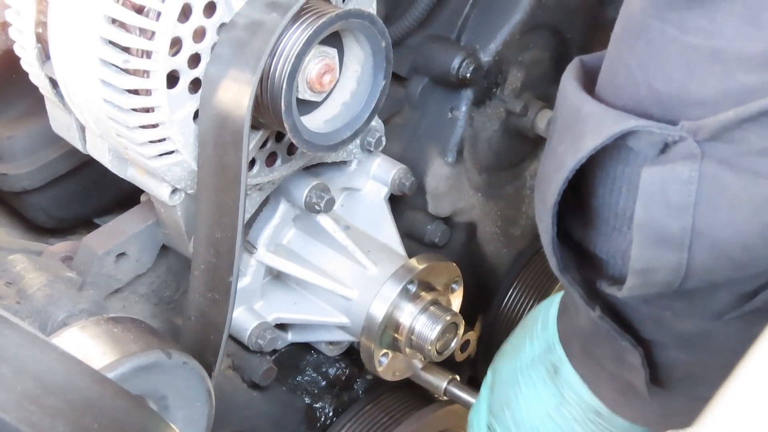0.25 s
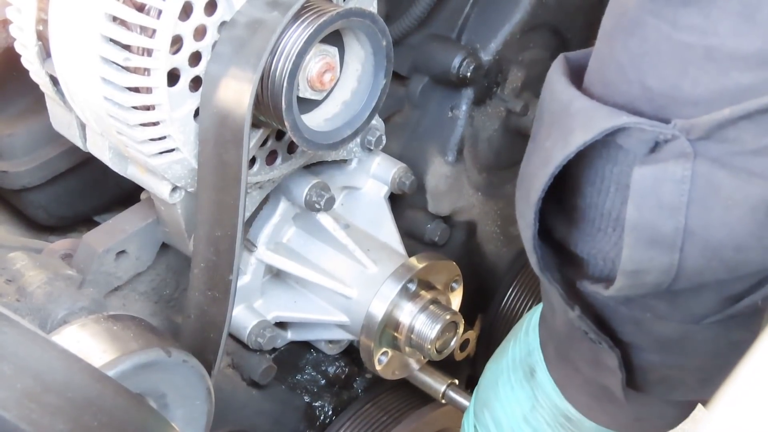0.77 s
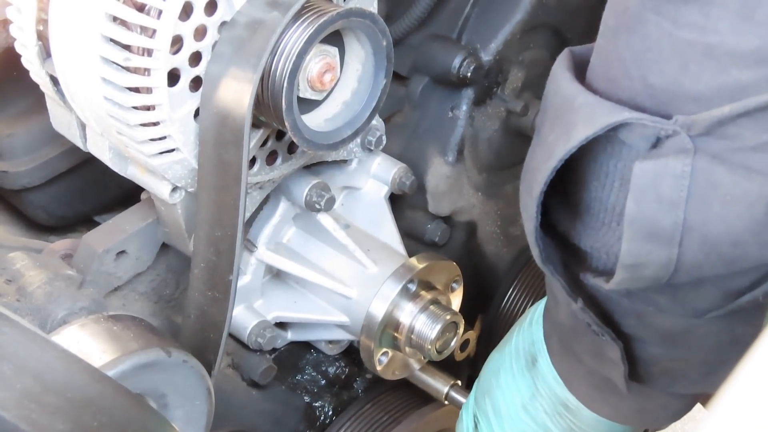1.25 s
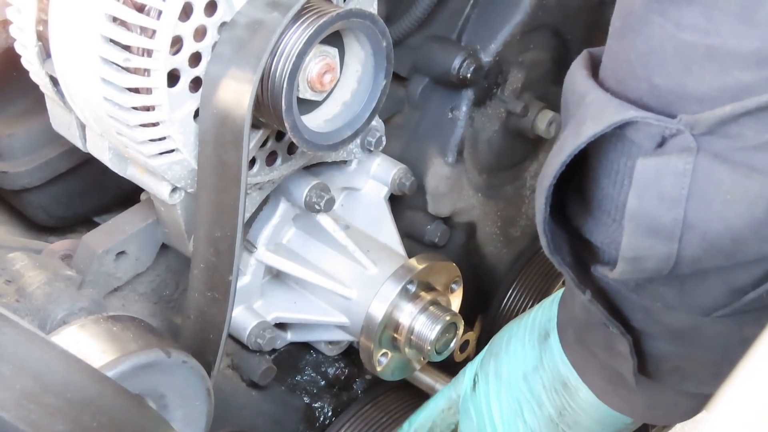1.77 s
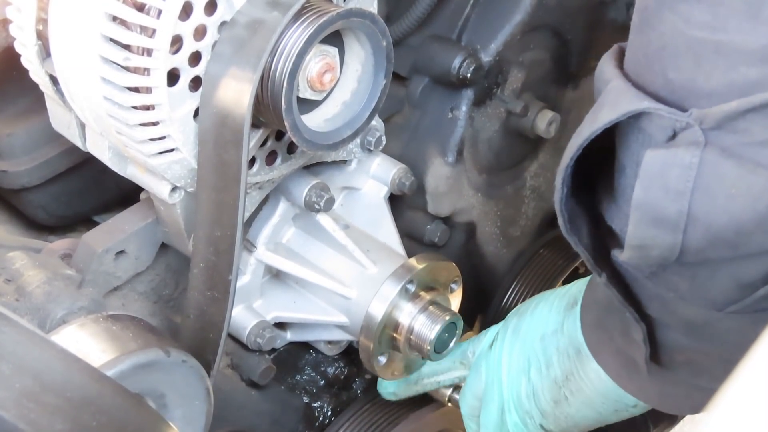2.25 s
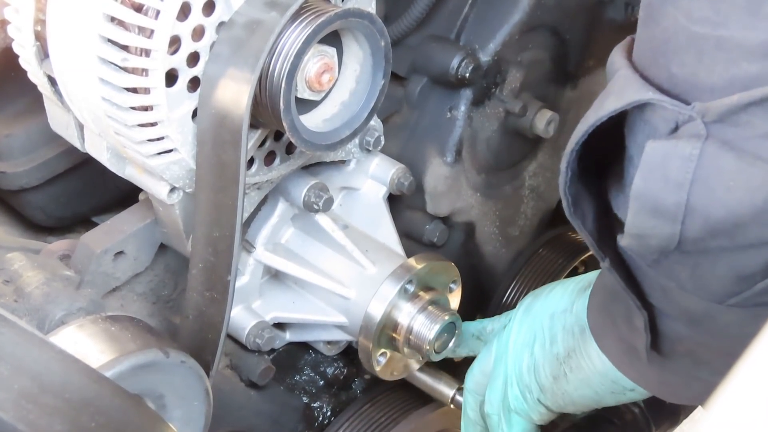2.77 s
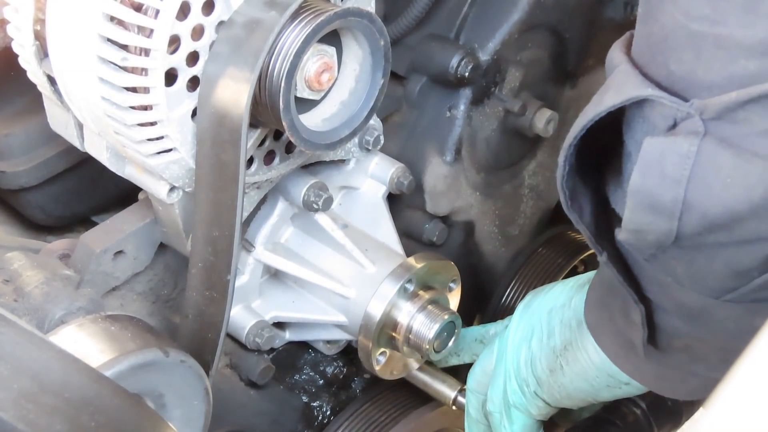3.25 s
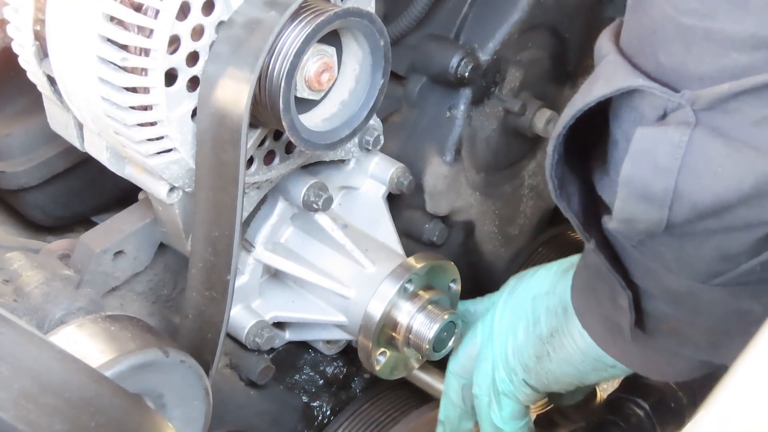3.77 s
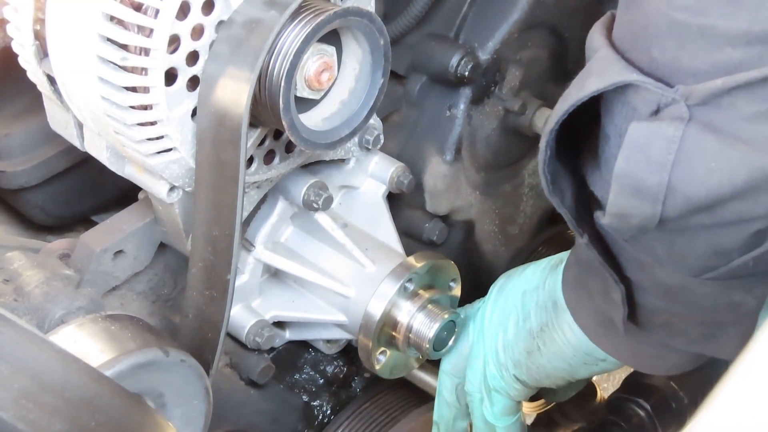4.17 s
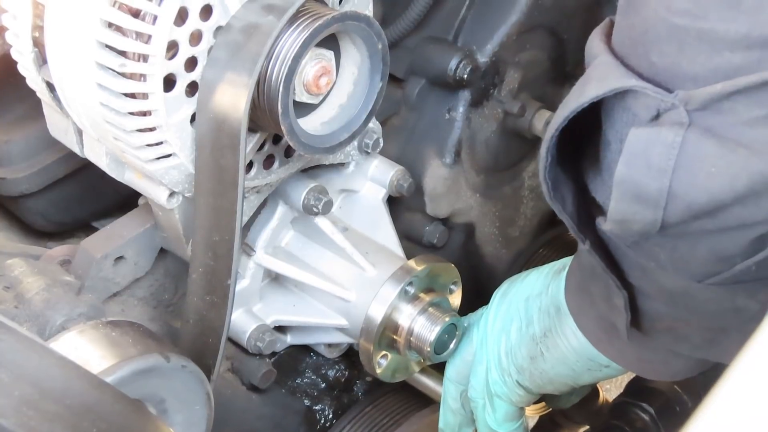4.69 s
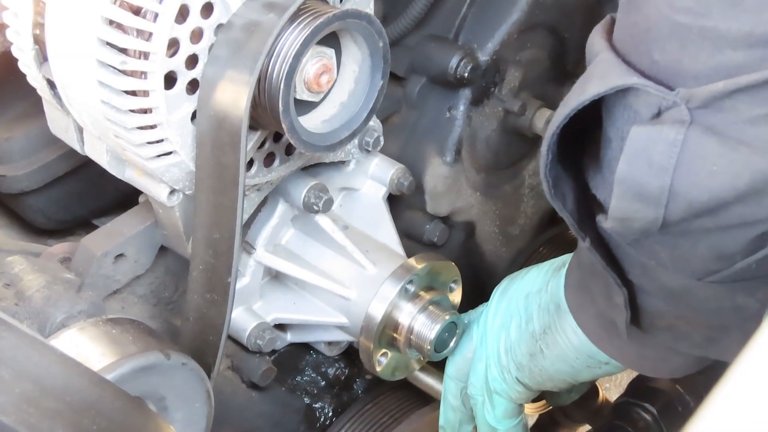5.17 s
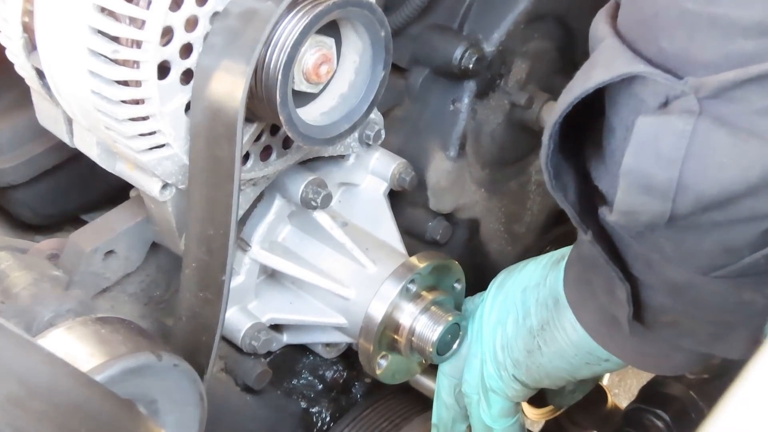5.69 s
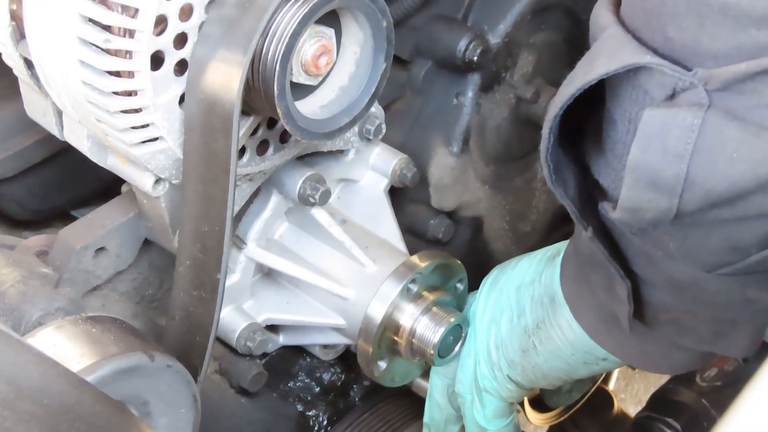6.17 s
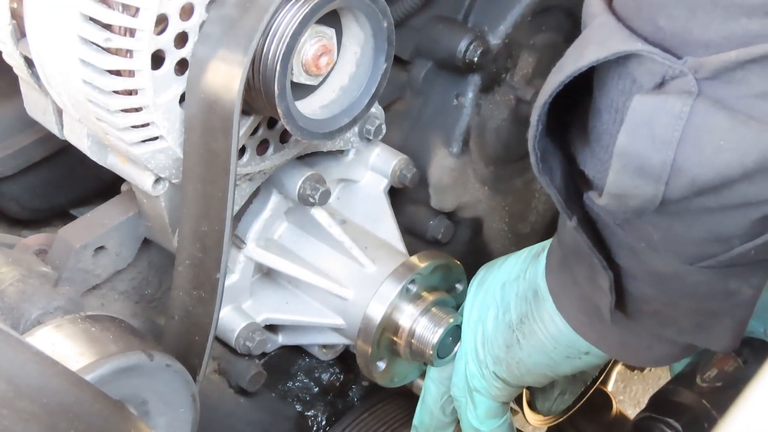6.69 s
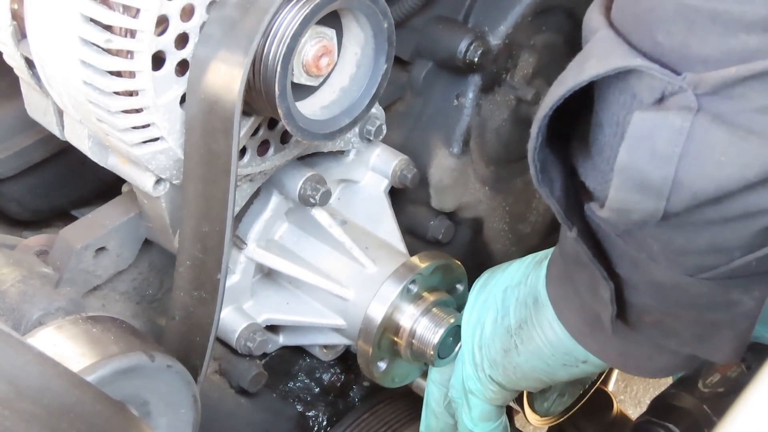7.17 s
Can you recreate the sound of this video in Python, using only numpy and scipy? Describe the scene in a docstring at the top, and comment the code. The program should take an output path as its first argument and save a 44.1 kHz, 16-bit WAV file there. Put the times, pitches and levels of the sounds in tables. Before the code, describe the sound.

A power ratchet clicks onto an engine bolt, knocks as it starts, then runs with a fast metallic rattle, pausing once near the end.

```python
"""In a workshop, a power ratchet runs a bolt out of an engine block, heard from close by.
The socket clicks onto the bolt, the tool knocks slowly as it starts, then runs at full speed.
A crank rocks the pawl (the catch that drives the teeth) about 55 times a second; gears and socket
rattle and make the steel head ring, while the air in the case hums. Near the end the trigger is
let go once and pulled again. Faint room hiss and a low rumble lie underneath."""
import sys
import numpy as np
from scipy import signal
from scipy.io import wavfile

SR = 44100
rng = np.random.default_rng(int(sys.argv[2]) if len(sys.argv) > 2 else 0)


def bounce(signal):
    """Save signal as a 16-bit WAV file at the path given by the first command-line argument."""
    frames = np.transpose(np.atleast_2d(signal))
    limited = np.clip(frames, -1, 1)
    pcm = np.round(limited * 32767).astype(np.int16)
    wavfile.write(sys.argv[1], SR, pcm)


N = 327663
T = np.arange(N) / SR

# how fast the crank turns: t/s, speed/(turns a second)
CRANK_SPEED = [(.3, 18), (.45, 23), (.55, 36), (.62, 45), (.72, 52.4), (.8, 54.5), (1.3, 55.05),
               (2.2, 55.25), (3.5, 55.38), (4.7, 55.33), (5.5, 55.25), (6.62, 55.22), (6.8, 45), (7.08, 35),
               (7.16, 48), (7.28, 54.5), (7.43, 55.3)]
# the blows in one crank turn: place/turns, level into the head/dB, level into the treble/dB
TURN_BLOWS = [(.2, 3, -2), (.46, 0.1, -5), (.68, -1.5, -14), (.92, -1.5, 3.5), (.05, -12, -1.5)]


def gain_of(db):
    """Turns decibels into a factor to multiply by."""
    return 10 ** (np.asarray(db) / 20)


def evened(x):
    """Scales a signal to an average size (rms) of 1."""
    return x / np.sqrt(np.mean(x ** 2) + 1e-20)


def curve(rows, column=1):
    """Joins the points of a time table with straight lines, one value for each sample."""
    rows = np.asarray(rows)
    return np.interp(T, rows[:, 0], rows[:, column])


def wander(per_s):
    """A smooth random drift of size about 1; a higher per_s makes it quicker."""
    points = rng.standard_normal(round(N / SR * 60) + 2)
    smooth = signal.filtfilt(*signal.butter(2, np.clip(per_s / 30, .01, .9)), points)
    return np.interp(T * 60, np.arange(len(points)), evened(smooth))


def colour(x, points):
    """Makes some pitches louder and others softer, following points of f/Hz, level/dB."""
    f, db = np.transpose(points)
    log_hz = np.log(np.fft.rfftfreq(8192, 1 / SR) + 1)
    log_gain = np.interp(log_hz, np.log(f + 1), db) * np.log(10) / 20
    mirrored = np.r_[log_gain, log_gain[-2:0:-1]]
    phase = -signal.hilbert(mirrored).imag  # gives the least delay
    taps = np.fft.ifft(np.exp(mirrored + 1j * phase)).real[:4096]
    return signal.oaconvolve(x, taps)[:len(x)]


def ring(strength, hz, width):
    """One note of the steel, shaken by noise of the given strength; a smaller width rings longer."""
    r = np.exp(-np.pi * width / SR)
    resonator = [1, 0, -1], [1, -2 * r * np.cos(2 * np.pi * hz / SR), r * r]
    ringing = signal.lfilter(*resonator, strength * rng.standard_normal(N))
    return ringing / np.linalg.norm(signal.lfilter(*resonator, signal.unit_impulse(4096)))


def workshop():
    """Steady room hiss, turned down gradually once the tool runs, and a wavering rumble with bumps."""
    # tone of the hiss and of the rumble: f/Hz, level/dB
    hiss_colour = [(150, -21), (250, -6), (315, -8), (360, -11.5), (501, -1.5), (544, -4), (850, -2.5),
                   (1760, -18), (1910, -15), (3890, -23), (5070, -23.5), (6080, -24.5), (13000, -42)]
    rumble_colour = [(15, -24), (30, 8.5), (55, 7.5), (130, 7.5), (250, -24)]
    # volume setting of the hiss: t/s, level/dB
    hiss_volume = [(.7, -50.5), (7.43, -59.5)]
    # peaks of low bumps through hand and floor: t/s, level/dB
    bump_peaks = [(.13, -60), (.37, -48.5), (.49, -38), (.98, -57), (1.88, -63), (3.72, -63), (5.75, -57),
                  (6.4, -67)]
    rise_s, fade_s = .088, .11
    hiss = gain_of(curve(hiss_volume)) * evened(colour(rng.standard_normal(N), hiss_colour))
    bumps = sum(gain_of(db) * np.exp(-abs(T - s) / np.where(T < s, rise_s, fade_s))
                for s, db in bump_peaks)
    rumble_level = gain_of(-61 + 1.9 * wander(4)) + bumps
    return hiss + rumble_level * evened(colour(rng.standard_normal(N), rumble_colour))


def engine_bay(x):
    """Echoes: quick ones among the engine parts, and a faint long tail from the walls."""
    echoes = np.zeros(SR // 2)
    at = np.arange(100, len(echoes) - 20, 20)
    echoes[at + rng.integers(0, 20, len(at))] = rng.choice([-1., 1.], len(at))
    t = np.arange(len(echoes)) / SR
    echoes *= gain_of(-60 * t / .094) + gain_of(-41 - 60 * t / .7)
    dull = signal.lfilter(*signal.butter(1, 6000, fs=SR), x)
    return signal.oaconvolve(dull, echoes / np.linalg.norm(echoes))[:N]


def gear_tones(turns):
    """Faint tones of motor and gears, which form as the crank gains speed."""
    # the tones: multiple of the crank speed, relative level/dB
    partials = [(1, -49), (3, -45.5), (4, -49), (5, -41.5), (17 / 3, -40), (6, -41), (8, -38.5), (15, -34),
                (17, -29)]
    shaky = turns + .004 * wander(14)  # slack in the gears blurs the pitch
    tones = sum(gain_of(db + 3 * wander(6)) * np.sqrt(2) * np.sin(2 * np.pi * (k * shaky + rng.random()))
                for k, db in partials)
    return np.clip((curve(CRANK_SPEED) - 30) / 12, 0, 1) * tones


def case_hum(shaking, full_hz=638, width_hz=62):
    """The shaken air in the case hums, a little lower while the motor is slow."""
    pitch = full_hz * np.clip(curve(CRANK_SPEED) / 45, .88, 1)
    puffs = shaking * (rng.standard_normal(N) + 1j * rng.standard_normal(N))
    narrow = signal.lfilter(*signal.butter(2, width_hz / 2, fs=SR), puffs)
    return evened((narrow * np.exp(2j * np.pi * np.cumsum(pitch) / SR)).real)


def thin_rings(level, shake):
    """Three thin, high notes of the steel come and go as the bolt backs out."""
    # the notes: f/Hz, width/Hz
    notes = [(8100, 260), (9005, 90), (9180, 110)]
    # their strength: t/s, then a relative level/dB for each note
    strengths = [(.6, -27, -29, -28.5), (1.0, -34, -30, -9), (1.6, -29, -28, -13.5), (2.0, -30, -40, -37),
                 (2.6, -12.5, -28, -33.5), (3.6, -8, -16, -35), (3.9, -29, -10.5, -33),
                 (5.0, -25, -13.5, -31), (6.7, -19.5, -9, -30), (7.43, -21, -11, -28)]
    return sum(gain_of(curve(strengths, k + 1) + 3 * wander(20)) * ring(level * shake(), hz, width)
               for k, (hz, width) in enumerate(notes))


def socket_ring(level, shake):
    """The rattling socket rings at two notes close together."""
    # the notes: f/Hz, width/Hz, relative level/dB
    notes = [(2582, 70, -3.5), (2750, 130, -3.5)]
    return sum(gain_of(db) * ring(level * shake(steady=.5), hz, width) for hz, width, db in notes)


def steel(shaking, sway_db=0.):
    """The steel head clatters and rings; shaking(hz) says how hard it is shaken near that pitch."""
    # edges of the pitch ranges that a blow shakes unevenly: f/Hz
    edges = [100, 1100, 2200, 3300, 4700, 6800, 9500, 16000]
    # overall tone of the head: f/Hz, level/dB
    head_colour = [(120, -41), (200, -29), (315, -25.5), (392, -19.5), (629, -6.5), (728, -13), (939, -8),
                   (1030, -13), (1350, -6.5), (2650, 2.5), (4030, -3), (5480, 1), (8960, -3.5),
                   (13600, -15.5), (15500, -31.5)]
    # weaker notes of head and socket: f/Hz, width/Hz, relative level/dB
    notes = [(1330, 50, -27), (1900, 200, -19), (3060, 65, -19), (3585, 65, -19), (3760, 70, -18),
             (4245, 70, -21), (4378, 65, -21), (5010, 90, -20), (5550, 260, -15), (6350, 280, -15),
             (6990, 100, -19), (10400, 350, -23), (11550, 280, -25), (13430, 250, -27), (14450, 450, -32)]
    noise = sum(signal.sosfilt(signal.butter(2, band, "band", fs=SR, output="sos"),
                               shaking(np.mean(band)) * rng.standard_normal(N))
                for band in zip(edges, edges[1:]))
    sound = colour(noise, head_colour) / np.linalg.norm(colour(signal.unit_impulse(4096), head_colour))
    for hz, width, db in notes:
        sway = sway_db * wander(3.3)  # the grip shifts which notes stand out
        sound += gain_of(db + sway) * ring(shaking(hz), hz, width)
    return sound


def knocks():
    """Single knocks of socket and pawl: a clack of steel, a short ping and a thump through the block."""
    # t/s, level/dB, ping f/Hz, time to fade 60 dB/s; added to the level: ping/dB, treble/dB, thump/dB
    hits = [(0.0542, -19, 2230, 0.078, 1, -9, 2), (0.0924, -16.5, 1950, 0.043, 4, -1, 10),
            (0.173, -47.5, 2160, 0.042, 6, -10, 0), (0.2570, -39, 2570, .045, 3, -17, -5),
            (0.280, -43, 4500, .05, -3, -2, -6), (0.286, -42, 1850, 0.056, -1, -15, 10),
            (0.3245, -17, 1880, 0.038, 5.5, -3, 5), (0.336, -14.5, 3020, 0.064, -2, 3, -4),
            (0.346, -11, 2200, 0.081, -1, -10, 0), (0.352, -4.5, 2260, 0.083, 2, -2, -1),
            (0.385, 1, 1960, 0.031, -2.5, -2.5, -10), (0.441, -8.5, 3520, 0.053, 1.5, -13, 5),
            (0.4566, -8, 1607, 0.05, -0.5, -13, 8), (0.4855, -6.5, 3560, 0.055, 0, -13, 1),
            (0.5216, -6.5, 3460, 0.032, 1.5, -2, 7), (0.5506, -7.5, 3390, 0.07, -1, -5, 5),
            (0.576, -4.5, 2550, 0.035, -3, -9, -2), (0.6, -8, 1850, 0.029, 1, 1, 6),
            (0.624, -12, 2220, 0.11, 5, -2, 1), (0.721, -15, 2500, 0.037, 6, -6, 4),
            (0.7424, -19.5, 3000, 0.036, 0, -9, 5), (0.7972, -10, 2580, 0.023, 3, -7, -6),
            (0.85, -5.5, 2580, 0.024, 1.5, -3, -3), (6.757, -12, 2550, .034, 0.5, 7, -15),
            (6.78, -19, 636, 0.036, 0.5, 3, -1), (6.8514, -49, 2270, .048, -4, -8, 3),
            (7.0247, -50, 2350, .058, 0, -6, 7), (7.0524, -54, 2270, .05, -6, 0, 0),
            (7.0863, -35, 4080, 0.092, 4, -6, 4), (7.116, -13.5, 2720, .025, 1, -6, 3),
            (7.136, -19, 3000, 0.033, 0, -6, -8), (7.166, -18, 2720, .045, 2, -8, -5)]
    knock_rise_s, ping_rise_s, ping_fade_s = .0024, .0017, .03
    drive, bright, thump, pings = np.zeros((4, N + SR))
    t = np.arange(SR // 8) / SR
    for s, db, hz, fade_s, ping_db, treble_db, thump_db in hits:
        at = slice(round(s * SR), round(s * SR) + len(t))
        burst = gain_of(db - 60 * t / fade_s) * np.minimum(t / knock_rise_s, 1)
        drive[at] += burst
        bright[at] += gain_of(treble_db) * burst
        thump[at] += gain_of(thump_db) * burst
        ping_level = gain_of(db + ping_db - 60 * t / ping_fade_s) * np.minimum(t / ping_rise_s, 1)
        pings[at] += ping_level * np.sin(2 * np.pi * hz * t)
    thump_noise = thump[:N] * rng.standard_normal(N)
    block = signal.lfilter(*signal.butter(2, [380, 1500], "band", fs=SR), thump_noise)
    clack = steel(lambda hz: drive[:N] if hz < 4700 else bright[:N])
    dull = signal.lfilter(*signal.butter(1, 7000, fs=SR), clack)  # every clack is slightly dulled
    return dull + block + pings[:N]


def rattle(turns, late, size_db, column, fade_s, rise_s, teeth_db, steady):
    """How hard the steel shakes: uneven blows in each turn, over 600 small tooth hits a second."""
    blows = np.array(TURN_BLOWS)
    blow_turns = np.arange(len(late))[:, None] + blows[:, 0] + late
    at = np.interp(blow_turns, turns, np.arange(N)).astype(int)
    uneven_db = size_db + 3 * np.clip(rng.standard_normal(late.shape), -2, 2)
    hits = np.zeros(N)
    np.add.at(hits, at.ravel(), gain_of(blows[:, column] + uneven_db).ravel())
    tooth_place, tooth_force = rng.random((round(600 * N / SR), 2)).T
    hits[(tooth_place * N).astype(int)] += gain_of(teeth_db + 13.5 * tooth_force ** 3)
    for seconds in (fade_s, rise_s):
        hits = signal.lfilter([1], [1, -np.exp(-1 / (seconds * SR))], hits)
    return evened(evened(hits) + steady)


def motor_on(rise_s=.0063, fade_db_per_s=602):
    """The motor starts and stops fast: it chokes once on the tight bolt, later the trigger is let go."""
    # each run: start/s, stop/s
    runs = [(0.316, 0.38), (.416, 6.775), (7.1, 7.6)]
    return sum(np.clip((T - on) / rise_s, 0, 1) * gain_of(-np.clip(fade_db_per_s * (T - off), 0, 150))
               for on, off in runs)


def ratchet():
    """The running tool: blows from the crank shake head, socket and case while the bolt comes loose."""
    # the changing mix: t/s, base level/dB; added to it: treble/dB, socket/dB, case hum/dB
    loosening = [(.42, -17, -3, -14, -16), (.46, -15, -2.5, -14, -12), (.55, -16, -2.5, -12, -8),
                 (.64, -17, -0.5, -17, -22), (.9, -17.5, -2.5, -8, -24), (1.3, -17.5, -3, -11, -21),
                 (2.2, -17.5, -2.5, -17, -25.5), (3., -18.5, -2, -9.5, -26.5), (4., -19, -1, -6.5, -27),
                 (5.5, -19.5, -.5, -7, -27.5), (6.3, -19.5, -0.5, -6.5, -24.5),
                 (6.74, -19.5, -0.5, -9, -24), (6.79, -23, -2.5, -10, -10), (7.1, -21.5, 2, -11, -12),
                 (7.132, -22, 3, -8, -5.5), (7.175, -18, 0, -2.5, -24), (7.43, -19, 0, -4, -23)]
    speed, full_speed = curve(CRANK_SPEED), 55.3  # turns a second
    turns = np.cumsum(speed) / SR + .2973
    slow = np.maximum(1 - speed / full_speed, 0)
    level = motor_on() * gain_of(curve(loosening) - 13 * slow + .3 * wander(8))
    # while the crank is slow, the treble is weaker and dips once a turn
    dip_db = -7 - 15.5 * np.cos(2 * np.pi * (turns - .09))
    treble_level = level * gain_of(curve(loosening, 2) + dip_db * slow + .5 * wander(9))
    socket_level = level * gain_of(curve(loosening, 3) + 2.2 * wander(18))
    case_level = level * gain_of(curve(loosening, 4) + .89 * wander(6.1))
    # each blow is a little off in time and strength, and all parts share that
    chance = np.clip(rng.standard_normal((int(turns[-1]) + 1, len(TURN_BLOWS), 2)), -2, 2)
    late, size_db = .018 * chance[..., 0], 2.2 * chance[..., 1]

    def low_shake(steady=1.):
        return rattle(turns, late, size_db, 1, fade_s=.0013, rise_s=.0003, teeth_db=-10, steady=steady)

    def high_shake():
        return rattle(turns, late, size_db, 2, fade_s=.0018, rise_s=.0006, teeth_db=-8, steady=1.03)

    head = steel(lambda hz: level * low_shake() if hz < 4700 else treble_level * high_shake(), sway_db=2)
    socket = socket_ring(socket_level, low_shake)
    thin = thin_rings(treble_level, high_shake)
    hum = case_level * case_hum(low_shake())
    return gain_of(1.5) * head + socket + thin + hum + level * gear_tones(turns)


def scene():
    """The tool and its echoes in the engine bay, over the sound of the workshop."""
    tool = ratchet() + knocks()
    return (tool + gain_of(-10) * engine_bay(tool) + workshop())[None]


def record(dry):
    """Clips the peaks of the hardest knocks, then cuts the very highest treble."""
    top_hz = 15620
    low_pass = signal.firwin(511, top_hz, window=("kaiser", 9), fs=SR)
    return signal.oaconvolve(np.clip(dry, -1, 1), low_pass[None], "same")


dry = scene()
out = record(dry)
bounce(out)
```